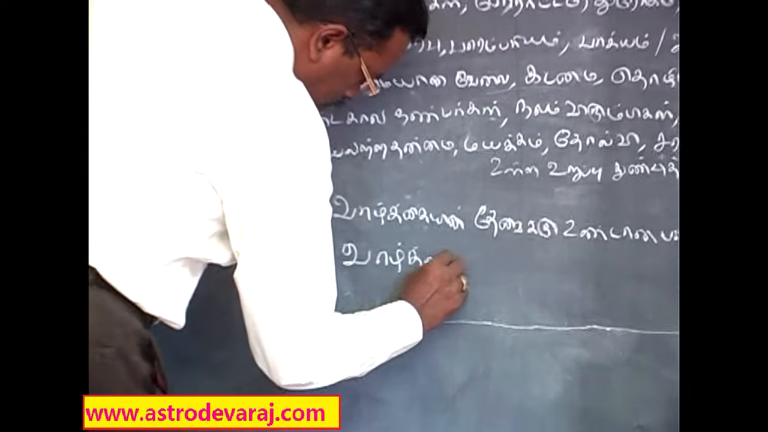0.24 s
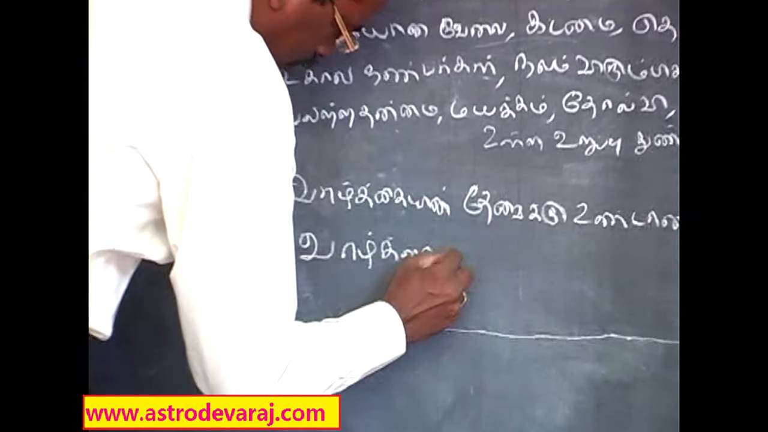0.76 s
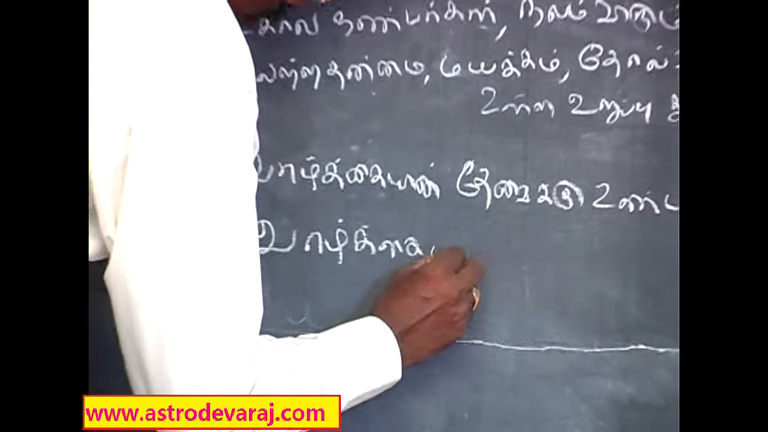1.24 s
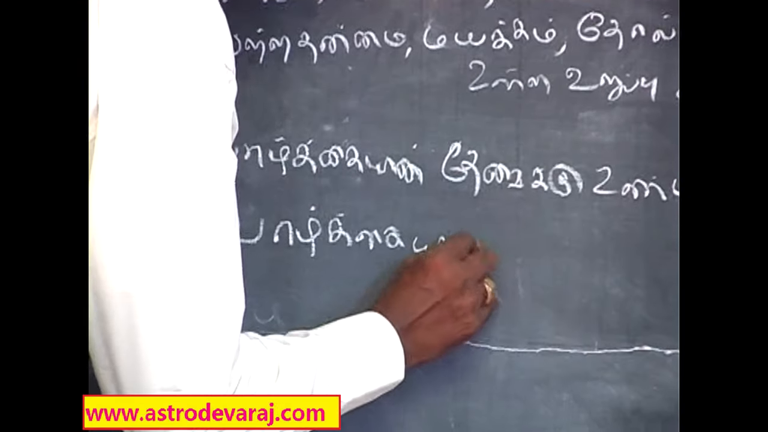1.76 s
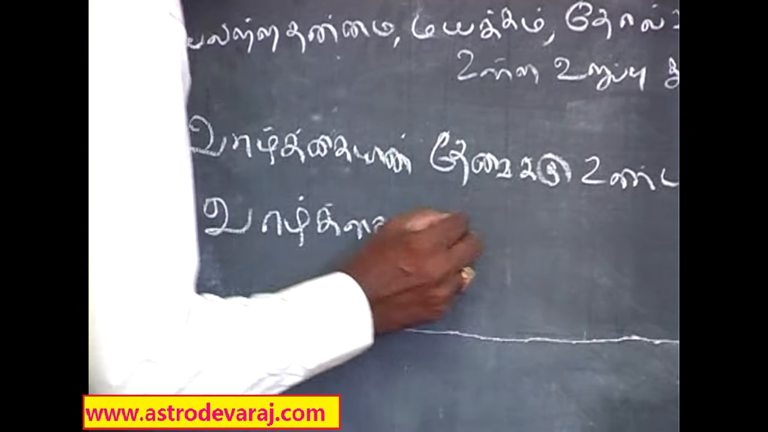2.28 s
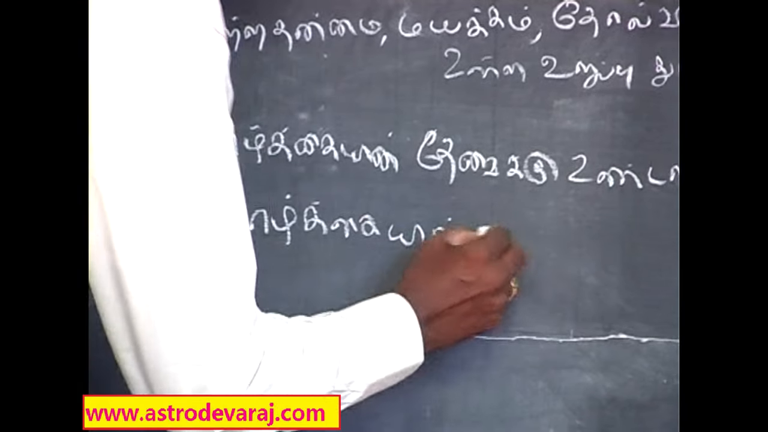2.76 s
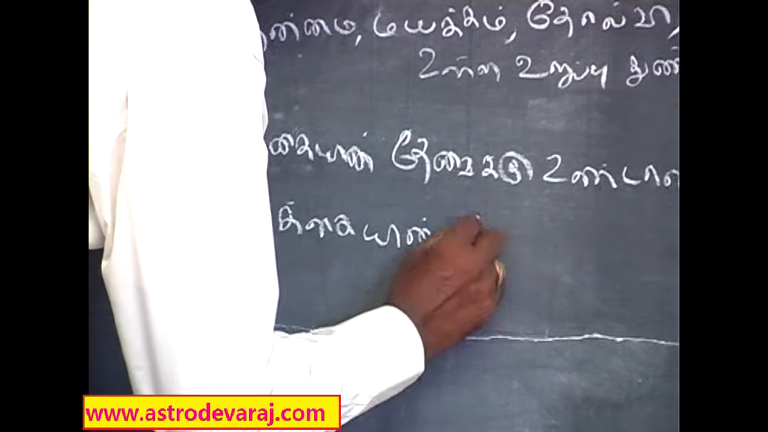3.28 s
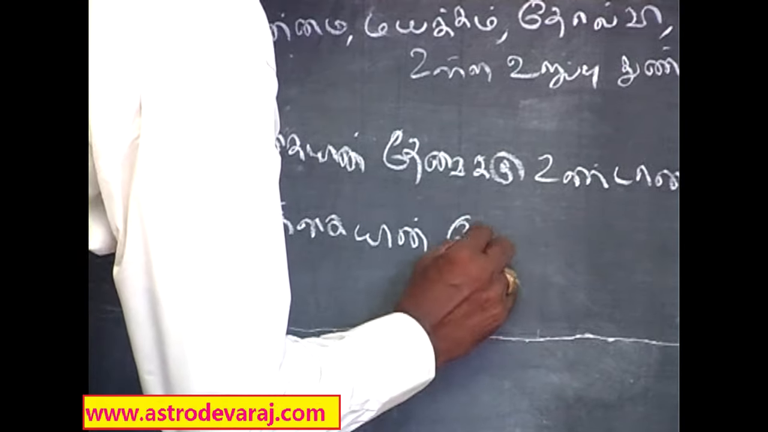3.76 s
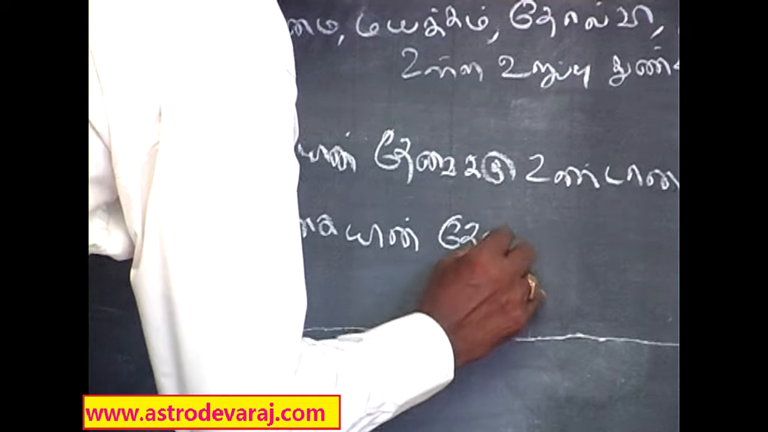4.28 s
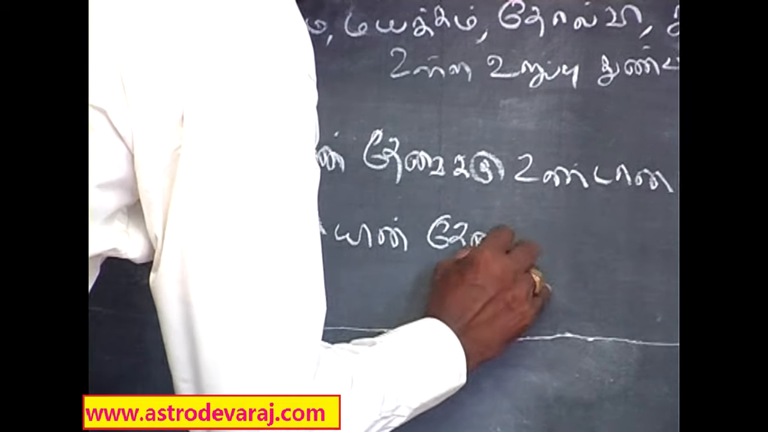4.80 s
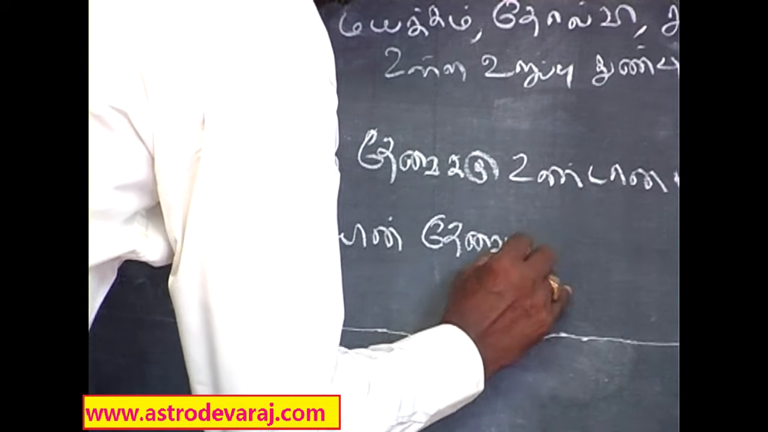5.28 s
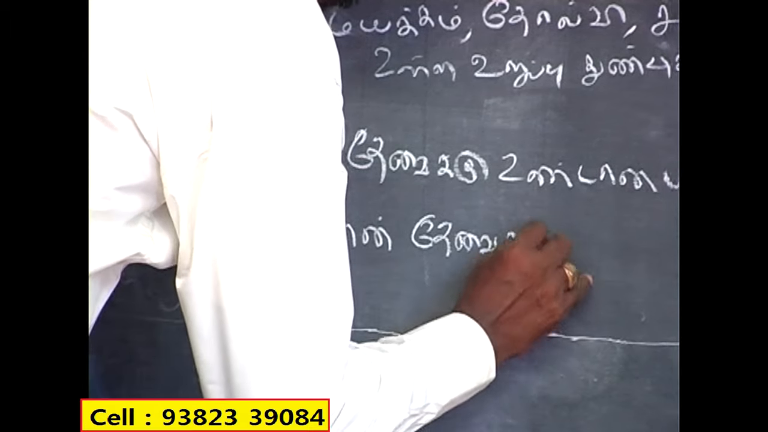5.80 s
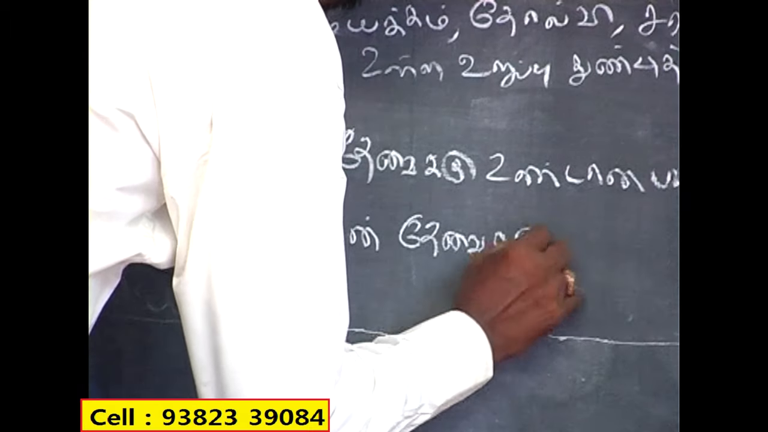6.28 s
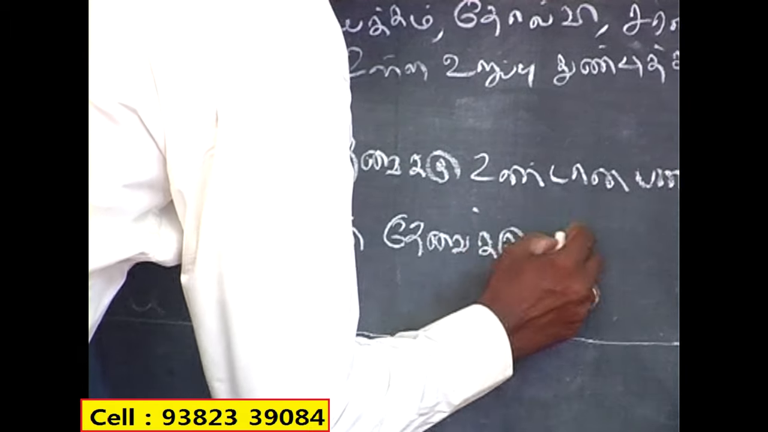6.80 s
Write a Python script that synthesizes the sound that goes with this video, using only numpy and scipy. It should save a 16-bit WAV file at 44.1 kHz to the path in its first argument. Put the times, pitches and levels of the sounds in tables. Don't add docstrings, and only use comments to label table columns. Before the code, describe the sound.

Rapid handwriting with chalk on slate: bright, whistling squeaks lasting under a tenth of a second, dipping and rising slightly in pitch. Dry ticks and soft hand thumps fall between them. After a pause near the start and a longer one later, squeaks recur several times a second, ending with a strong rough squeal and tick. Close microphone, low overload thuds, short hard-room echo and faint steady air.

```python
import sys
import numpy as np
from scipy import signal
from scipy.fft import rfft, irfft, next_fast_len
from scipy.io import wavfile
from scipy.ndimage import uniform_filter1d

SR = 44100
rng = np.random.default_rng(int(sys.argv[2]) if len(sys.argv) > 2 else 0)


def generate_wav(sig):
    pcm = np.round(np.clip(np.atleast_2d(sig).T, -1, 1) * 32767).astype(np.int16)
    wavfile.write(sys.argv[1], SR, pcm)


def volts_from_decibels(level):
    exponent = np.asarray(level, float) / 20
    return 10 ** exponent


N = 310905


def evened(x):
    return x / np.sqrt(np.mean(x ** 2) + 1e-20)


def read(points, hz):
    f, value = np.transpose(points)
    return np.interp(np.log(hz + 1), np.log(f + 1), value)


def add(mix, s, sound):
    part = mix[round(s * SR):][:len(sound)]
    part += sound[:len(part)]


def filtered(x, points):
    size = next_fast_len(N + 4096)
    hz = np.fft.rfftfreq(size, 1 / SR)
    return irfft(rfft(x, size) * volts_from_decibels(read(points, hz)), size)[..., :N]


def coloured(points, size):
    hz = np.fft.rfftfreq(size, 1 / SR)
    return evened(irfft(rfft(rng.standard_normal(size)) * volts_from_decibels(read(points, hz)), size))


def drift(size, hz):
    return coloured([(hz, 0), (4 * hz, -50), (20 * hz, -100)], N)[:size]


def slip_rate(t, length, land_hz, dive, low_hz, climb, lift_hz):
    digging = np.maximum(1 - t / dive, 0) ** 1.6
    rising = np.clip(1.2 * (1 - (length - t) / climb), 0, 1)
    lifting = np.sin(np.pi / 2 * rising) ** 2
    return low_hz + (land_hz - low_hz) * digging + (lift_hz - low_hz) * lifting


def partial(phase, db, fuzz, flutter_db=3.0):
    size = len(phase)
    level = volts_from_decibels(db + flutter_db * drift(size, 84)) * (1 + fuzz * drift(size, 450))
    return level * np.sqrt(2) * np.cos(phase + 2 * np.pi * rng.random())


# (t/s, half-length/s, level/dB)
UNSTEADY_SPELLS = [
    (0.017, .014, -25.5),
    (0.404, 0.013, -44.5),
    (1.355, 0.017, -38),
    (1.785, .012, -45),
    (1.822, .012, -49.5),
    (2.011, 0.013, -44.5),
    (5.0, .02, -57.5),
    (6.238, 0.012, -19),
    (6.263, .012, -31),
    (6.213, .015, -39),
]


def unsteadiness(t):
    return sum(volts_from_decibels(db) * np.exp(-((t - s) / half) ** 2) for s, half, db in UNSTEADY_SPELLS)


# (f/Hz, level/dB per Hz)
GRIT_COLOUR = [(100, -11.5), (250, -3), (660, -11.5), (1400, -11.5), (2100, -19), (3600, -30.5),
               (5500, -17), (8000, -28), (11800, -35.5), (12400, -73.5)]
# (f/Hz, level/dB per Hz)
CRUMBLE_COLOUR = [(4500, -19.5), (7000, -1.5), (10500, -1.5), (12300, -8.5), (13000, -40.5)]


def scrape(along, pressure, spells, swell_db, grit_db=-27, hiss_db=-20.5):
    size = len(along)
    grit = volts_from_decibels(grit_db) * pressure * coloured(GRIT_COLOUR, 8192)[:size]
    grit *= 0.2 + along
    return grit + volts_from_decibels(hiss_db + swell_db) * spells * coloured(CRUMBLE_COLOUR, 8192)[:size]


# (start t/s, length t/s, rise t/s, pressure level/dB, fade level/dB)
STROKE_PRESSURES = [(0.0, 0.025, .004, -14, -8.5), (0.198, .04, 0.012, -10.5, -13),
                    (0.374, .065, .034, -12, -13), (1.093, .053, 0.016, -14.5, -0.5),
                    (1.29, .108, 0.043, -12, -3), (1.752, .086, 0.031, -13.5, -6),
                    (1.973, .08, 0.022, -12.5, -8), (3.144, 0.057, .026, -16, -19),
                    (3.377, .038, .013, -12.5, -14), (3.612, .03, 0.015, -23.5, -4.5),
                    (3.818, .028, 0.01, -39.5, -6.5), (4.251, .043, .022, -16, -8),
                    (4.468, .031, .02, -11, -9), (4.655, .035, .013, -66.5, 2),
                    (4.96, .08, .028, -12, -7.5), (5.181, .058, 0.028, -14.5, -11),
                    (5.378, 0.056, .004, -39, -20), (5.41, .036, .01, -15.5, -5.5),
                    (5.669, .024, 0.013, -22, -13), (5.828, .039, 0.013, -14, -6),
                    (5.996, .012, .005, -49, -12.5), (6.173, .107, .022, -14, -6.5)]
# (landing f/Hz, dive t/s, full-pressure f/Hz, climb t/s, lifting f/Hz)
STROKE_GLIDES = [(2530, .003, 2530, .028, 2670), (2540, .008, 2525, .032, 2610),
                 (2780, .044, 2510, .014, 2590), (2720, .032, 2450, .01, 2620),
                 (2690, .056, 2315, .016, 2420), (2590, .046, 2320, .04, 2750),
                 (2530, .036, 2310, .042, 2760), (2700, .028, 2510, .03, 2720),
                 (2640, .008, 2620, .03, 2790), (2740, .005, 2735, .025, 2780),
                 (2650, .01, 2640, .01, 2640), (2590, .004, 2585, .038, 2730),
                 (2560, .003, 2555, .028, 2670), (2670, .01, 2660, .01, 2670),
                 (2860, .038, 2485, .04, 2550), (2600, .012, 2580, .046, 2730),
                 (2600, .01, 2580, .01, 2570), (2570, .012, 2520, .026, 2760),
                 (2740, .005, 2730, .015, 2770), (2570, .01, 2530, .028, 2710),
                 (2670, .005, 2660, .005, 2670), (2760, .034, 2520, .068, 2770)]
# (second partial level/dB, third partial level/dB)
STROKE_BITES = [(1, 1.5), (-6, -4), (2, 2.5), (-2, 3.5), (-5.5, -9), (-2, -1.5), (0, 0), (-6.5, -3),
                (-3.5, -5.5), (0.5, -9), (-8, -7), (-1.5, -4), (1.5, -3), (-15.5, -15), (1, 3), (2.5, -1.5),
                (-4.5, -4), (1, 8), (-5.5, -13), (1, 1.5), (-7, -13), (3.5, 5)]
# (f/Hz, level/dB)
BOARD_RADIATION = [(2300, -2.94), (2550, -2), (2800, 0), (4600, 1), (5100, -1.5), (5600, -1), (7000, 1.1),
                   (8400, -3.5)]
# (multiple of the slip rate, level/dB from the third)
UPPER_PARTIALS = [(4, -16.5), (5, -22), (6, -37.5)]
# (multiple of half the slip rate, level/dB)
HALF_PARTIALS = [(1, -4), (3, -6), (5, 0.5), (7, -19), (9, -23)]


def squeak(start, length, rise, db, fade_db, land_hz, dive, low_hz, climb, lift_hz, bite_db, edge_bite_db,
           waver_hz=10, fuzz_db=-30, spell_fuzz_db=-4, steady_db=-45.5):
    t = np.arange(0, length, 1 / SR)
    along = t / length
    slip_hz = slip_rate(t, length, land_hz, dive, low_hz, climb, lift_hz)
    turn = 2 * np.pi * np.cumsum(slip_hz + waver_hz * drift(len(t), 100)) / SR

    swell_db = -34 * np.maximum(1 - t / rise, 0) ** 1.6 * (start > 0)
    press_db = db + swell_db + fade_db * np.maximum((t - rise) / (length - rise), 0)
    first_db = press_db + read(BOARD_RADIATION, slip_hz)
    second_db = press_db + 2 + bite_db - 5 * along + read(BOARD_RADIATION, 2 * slip_hz)
    third_db = press_db - 9 + edge_bite_db - 3.5 * along + read(BOARD_RADIATION, 3 * slip_hz)
    third_db += 0.3 * (press_db + 12)
    edge_db = third_db + 0.3 * (third_db + 28)
    levels = [(1, first_db), (2, second_db), (3, third_db)]
    levels += [(k, edge_db + upper_db) for k, upper_db in UPPER_PARTIALS]

    spells = unsteadiness(start + t)
    fuzz = volts_from_decibels(fuzz_db) + volts_from_decibels(spell_fuzz_db) * spells
    half_db = 20 * np.log10(volts_from_decibels(press_db + steady_db) + spells * volts_from_decibels(swell_db))
    tone = sum(partial(k * turn, level_db, k ** 1.1 * fuzz) for k, level_db in levels)
    tone += sum(partial(k / 2 * turn, half_db + line_db, 0.1 + 0.04 * k) for k, line_db in HALF_PARTIALS)

    pressure = np.sqrt(volts_from_decibels(first_db) ** 2 + volts_from_decibels(second_db) ** 2) ** 0.57
    grit = scrape(along, pressure, spells, swell_db)
    landing = np.minimum((t + (start == 0)) / 0.003, 1) ** 2
    contact = np.minimum((length - t) / 0.004, 1) * landing
    return tone * contact, grit * contact


# (t/s, peak level/dB, treble share level/dB)
LANDINGS = [(0.184, -39.5, -14), (1.62, -51.5, -16), (2.218, -14, -14), (3.355, -35, -17),
            (3.597, -36, -19.5), (4.076, -58, -14.5), (4.66, -43, -25.5), (5.161, -50.5, -17.5),
            (5.643, -27, -27), (5.811, -22.5, -25.5), (6.494, -16.5, -13)]
# (f/Hz, level/dB per Hz)
LANDING_COLOUR = [(100, -18), (250, -4.5), (900, -4.5), (2400, -3.5), (4000, -25), (5800, -14.5),
                  (7500, -24.5), (10000, -35.5), (12500, -60.5)]


def tap(peak_db, treble_db):
    t = np.arange(4096) / SR
    crumbs = rng.standard_normal(4096) * volts_from_decibels(-60 * t / 0.063)
    crumbs[40] += 13
    hz = np.fft.rfftfreq(4096, 1 / SR)
    bright = volts_from_decibels(treble_db + read([(3500, -38.5), (4800, 1), (6200, -1.0), (8500, -51)], hz))
    burst = irfft(rfft(crumbs) * (volts_from_decibels(read(LANDING_COLOUR, hz)) + bright), 4096)
    edges = np.minimum(t / 0.00065, 1) * np.cos(t / t[-1] * np.pi / 2) ** 2
    return volts_from_decibels(peak_db + 3) * burst / np.abs(burst).max() * edges


# (t/s, level/dB, f/Hz, t60/s)
HAND_BUMPS = [
    (0.72, -57, 198.7, 0.051),
    (2.388, -48, 390, 0.135),
    (2.388, -45, 166, 0.14),
    (3.636, -39.5, 350, 0.12),
    (2.72, -50, 201, 0.076),
    (2.893, -55, 195, .06),
    (2.992, -52.5, 200.4, 0.057),
    (6.87, -55.5, 300, 0.05),
    (6.981, -50, 1658, 0.059),
]


def bump(db, hz, t60):
    t = np.arange(8192) / SR
    body = coloured([(hz / 1.2, -22), (hz, 0), (hz * 1.5, -22), (hz * 4, -80)], 8192)
    return volts_from_decibels(db - 60 * t / t60) * (1 - np.exp(-(t / 0.004) ** 2)) * body


# (t/s, length t/s, level/dB, f/Hz, width f/Hz)
HISSING_RUBS = [
    (2.572, 0.16, -73, 5800, 2000),
    (2.986, 0.061, -70.5, 5730, 2535),
]


def rub(length, db, hz, width_hz):
    hiss = coloured([(hz - width_hz, -18), (hz, 0), (hz + width_hz, -14)], round(length * SR))
    return volts_from_decibels(db) * hiss * np.hanning(len(hiss))


# (f/Hz, t60/s)
ROOM_DECAY = [(100, 0.31), (700, .3), (1400, .27), (2500, 0.2), (3900, 0.23), (5000, 0.18), (8000, 0.15),
              (12000, 0.1)]


def tail():
    echoes = np.zeros(SR // 2)
    at = np.arange(120, len(echoes) - 20, 20) + rng.integers(0, 20, (len(echoes) - 121) // 20)
    echoes[at] = rng.choice([-1., 1.], len(at))
    hz, t, z = signal.stft(echoes, SR, nperseg=256)
    decay = volts_from_decibels(-60 * t / read(ROOM_DECAY, hz)[:, None])
    out = signal.istft(z * decay, SR, nperseg=256)[1]
    return out / np.linalg.norm(out)


def classroom(x, wet_db=-8, side_db=-27.5):
    step = 2 * np.pi * np.arange(N) / SR / 0.89
    feeds = [np.sqrt(2 / 3) * np.cos(step + 2 * np.pi * k / 3) * x for k in range(3)]
    mid = sum(signal.fftconvolve(feed, tail())[:N] for feed in feeds)
    side = signal.fftconvolve(x, tail())[:N]
    side = filtered(side, [(400, -16.0), (5000, -4.5), (9000, 11)])
    return volts_from_decibels(wet_db) * mid + volts_from_decibels(side_db) * np.outer([1, -1], side)


# (f/Hz, level/dB per Hz)
AIR_COLOUR = [(15, -34.5), (25, -4.5), (141, -10), (203, 4.5), (300, -9), (361, 2), (593, -15.5), (676, -5),
              (1370, -13.5), (3700, -29), (10500, -25.5), (11700, -29.5), (13000, -48.5)]
# (f/Hz, correlation)
AIR_LIKENESS = [(60, 0.73), (400, 0.98), (2400, 0.97), (12000, 0.1)]
# (f/Hz, level/dB)
STEADY_WHINES = [(349.9, -72.5), (1739, -85.5), (6751, -91), (8102, -91.5), (11924, -85), (12075, -95)]


def air(level_db=-61):
    frames, hz = N // 256 + 5, np.fft.rfftfreq(1024, 1 / SR)
    a, b, c, d, patches = rng.standard_normal((frames, 513, 5)).T
    patches = evened(uniform_filter1d(uniform_filter1d(patches, 10, 0), 12, 1))
    same = np.clip(read(AIR_LIKENESS, hz), -1, 1)[:, None]
    left = a + 1j * b
    right = same * left + np.sqrt(1 - same ** 2) * (c + 1j * d)
    z = np.array([left, right]) * volts_from_decibels(read(AIR_COLOUR, hz)[:, None] + 0.5 * patches)
    tone = evened(signal.istft(z, nperseg=1024, noverlap=768)[1][:, :N])
    t = np.arange(N) / SR
    whine = sum(volts_from_decibels(db + 1.2 * drift(N, 8)) * np.sqrt(2) * np.sin(2 * np.pi * f * t)
                for f, db in STEADY_WHINES)
    return volts_from_decibels(level_db) * tone + whine


def scene():
    tones, noises = np.zeros((2, N))
    for stroke, glide, bite in zip(STROKE_PRESSURES, STROKE_GLIDES, STROKE_BITES):
        tone, grit = squeak(*stroke, *glide, *bite)
        add(tones, stroke[0], tone)
        add(noises, stroke[0], grit)
    for events, sound in [(LANDINGS, tap), (HAND_BUMPS, bump), (HISSING_RUBS, rub)]:
        for s, *shape in events:
            add(noises, s, sound(*shape))
    beamed = filtered(tones, [(5600, -0.5), (7000, -7), (12000, -19)])
    spread = volts_from_decibels(7.5) * noises
    balance = volts_from_decibels(np.array([[-0.25], [0.25]]))
    return volts_from_decibels(0.18) * tones + noises + classroom(beamed + spread) + balance * air()


def low_pass(x):
    return signal.sosfilt(signal.butter(12, 15700, fs=SR, output="sos"), x)


# (t/s, level/dB)
INPUT_JOLTS = [(0.211, -20.5), (0.725, -44.5), (1.106, -27.5), (1.775, -24.5), (1.81, -10), (1.991, -19),
               (2.021, -11.5), (2.225, -35), (2.394, -29.5), (2.725, -38.5), (2.898, -54.5), (2.993, -36.5),
               (3.39, -29), (3.627, -24.5), (3.832, -39.5), (4.271, -41.5), (4.485, -33), (5.42, -24),
               (5.682, -28), (5.84, -18), (5.86, -19.5), (6.498, -30.5), (6.868, -62.5)]
# (f/Hz, level/dB)
MIC_RESPONSE = [(20, -0.5), (12500, 0), (13900, -2.5), (14700, -24.5), (20000, -31)]


def record(dry, push_db=-6, cut_hz=15.8):
    envelope = np.abs(signal.hilbert(dry.mean(0), next_fast_len(N))[:N])
    slow = signal.filtfilt(*signal.butter(2, 110, fs=SR), envelope)
    sag = volts_from_decibels(push_db) * (np.maximum(slow, 0) + 0.008) ** 0.59
    t = np.arange(N) / SR
    sag += sum(volts_from_decibels(db) * np.exp(-0.5 * ((t - s) / 0.0026) ** 2) for s, db in INPUT_JOLTS)
    low_cut = signal.butter(4, cut_hz, "high", fs=SR, output="sos")
    x = dry - signal.sosfilt(low_cut, sag - sag[0])
    x = filtered(x, MIC_RESPONSE) * volts_from_decibels(np.array([[-0.2], [0.2]]))
    mix = np.clip(x, -1, 1)
    return low_pass(mix)


dry = scene()
out = record(dry)
generate_wav(out)
```